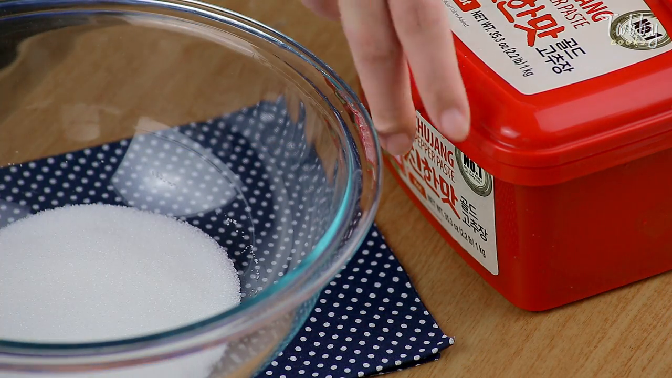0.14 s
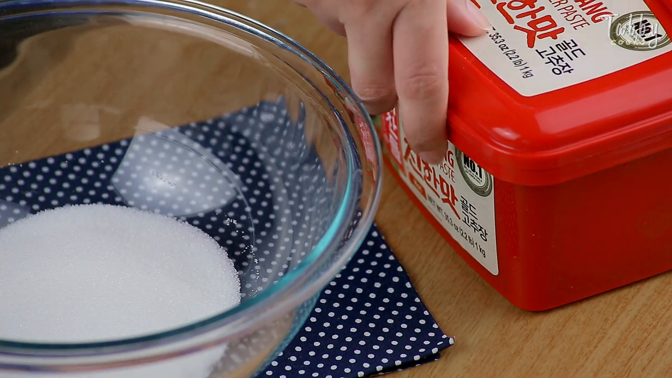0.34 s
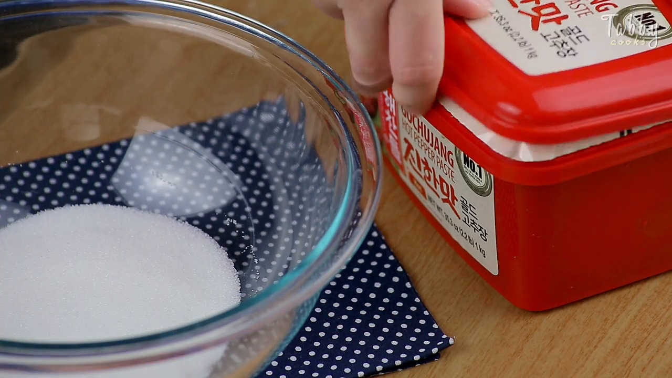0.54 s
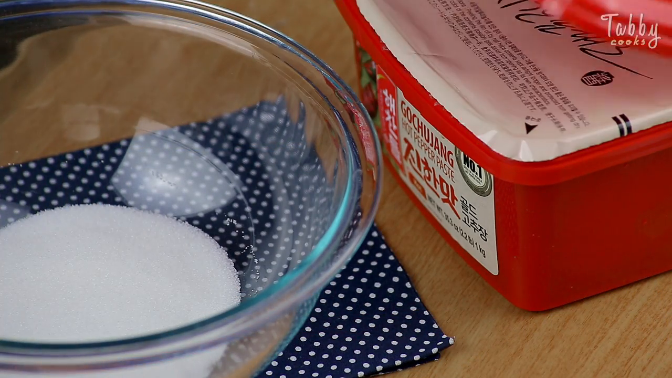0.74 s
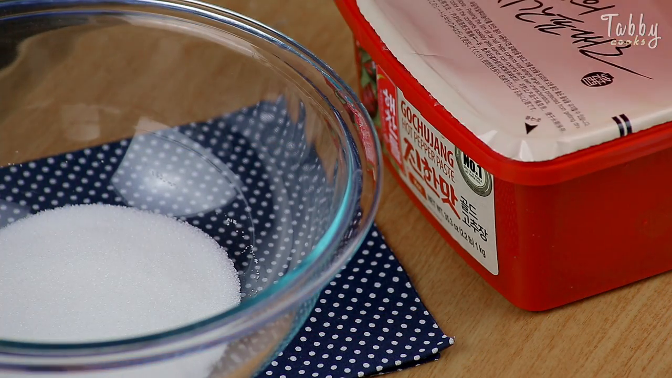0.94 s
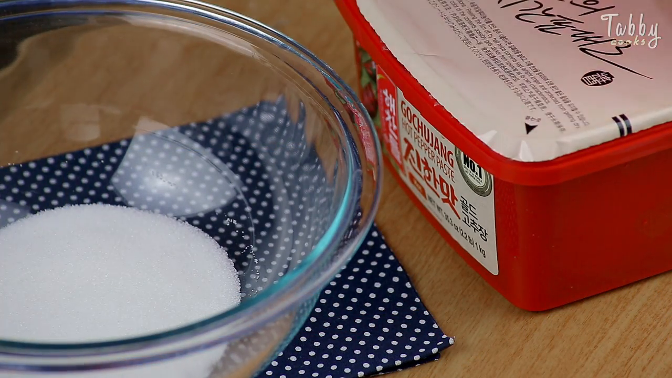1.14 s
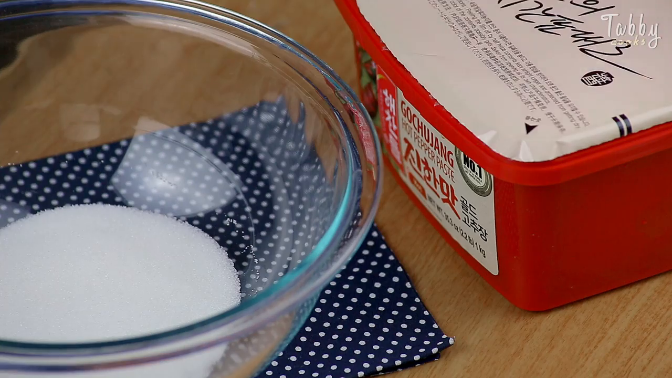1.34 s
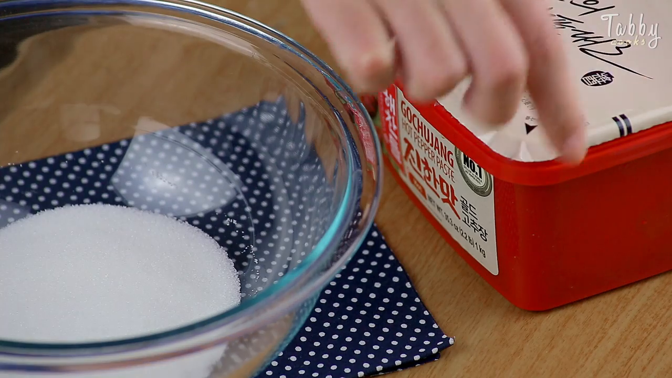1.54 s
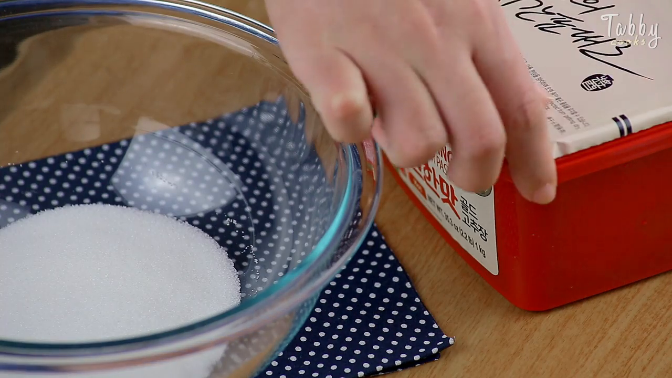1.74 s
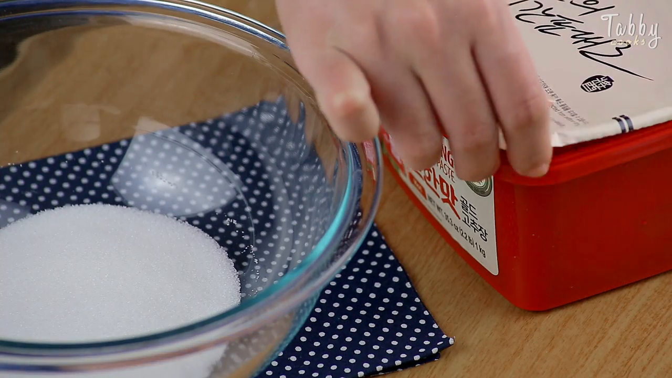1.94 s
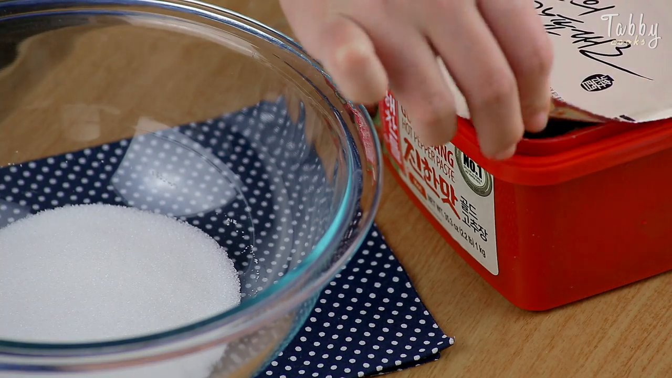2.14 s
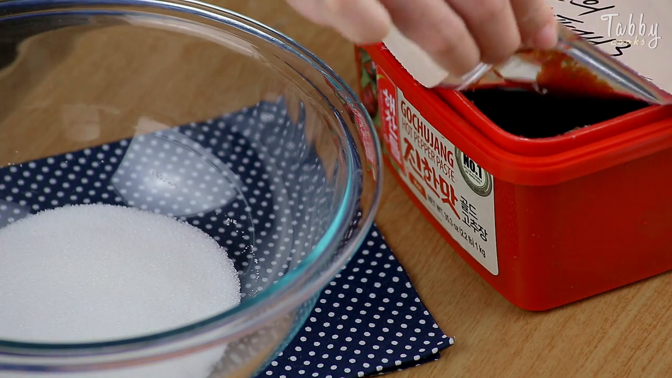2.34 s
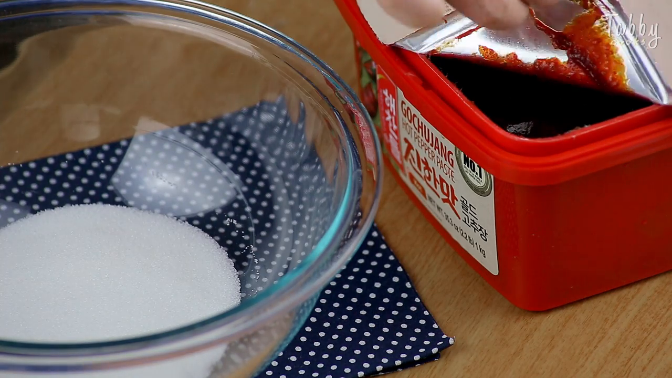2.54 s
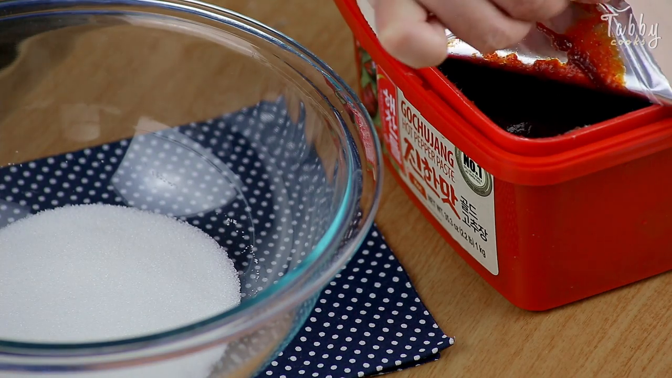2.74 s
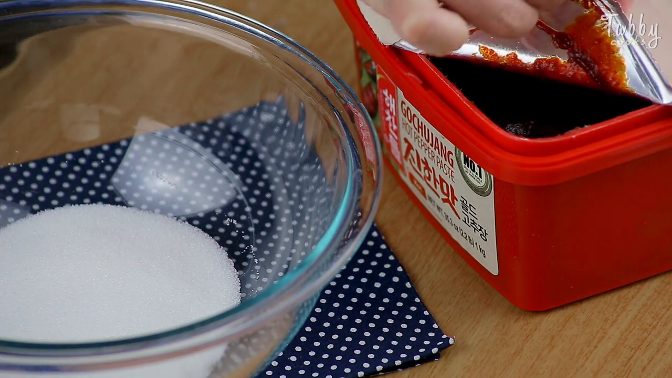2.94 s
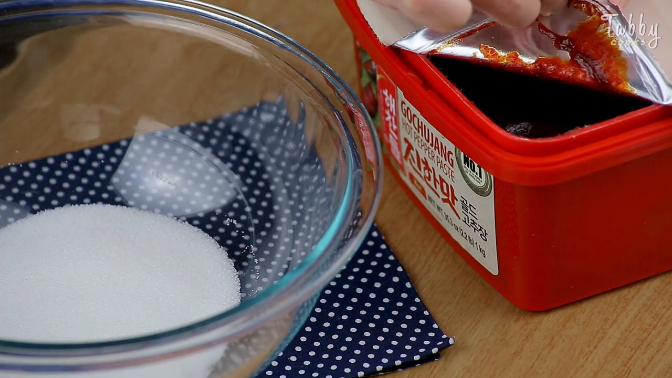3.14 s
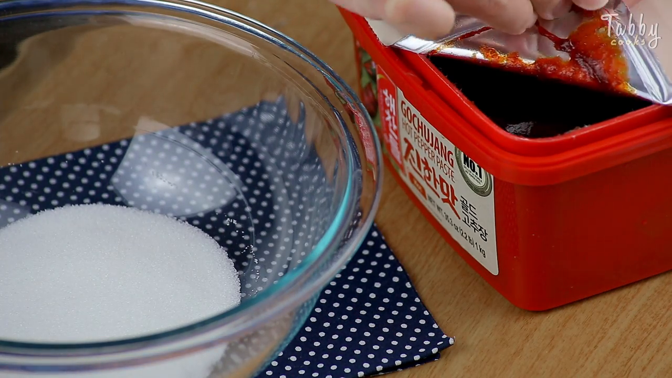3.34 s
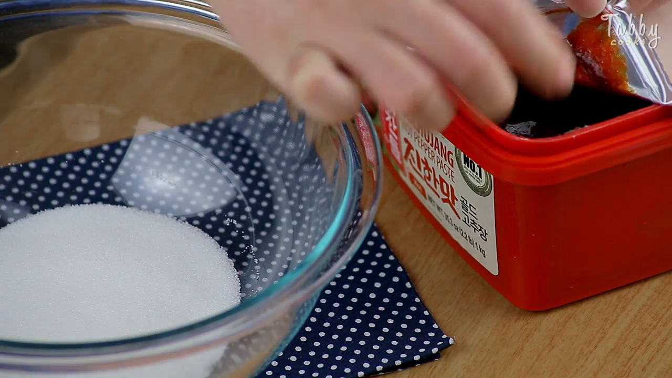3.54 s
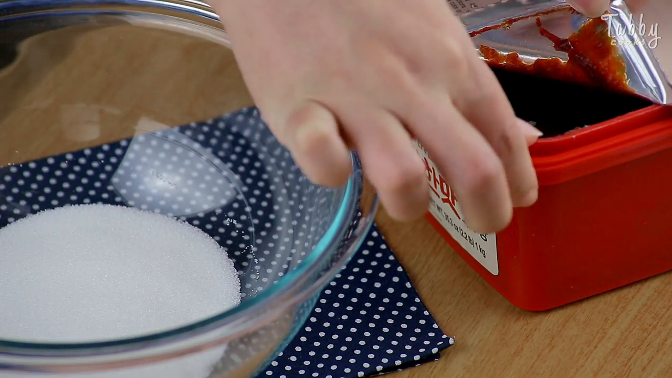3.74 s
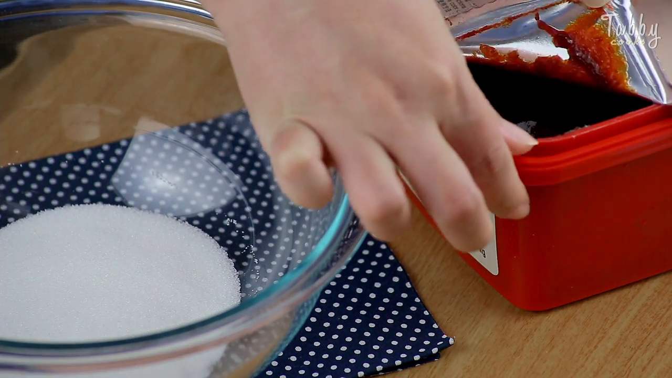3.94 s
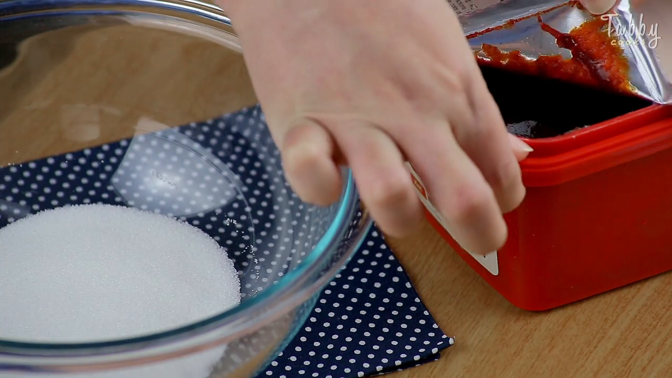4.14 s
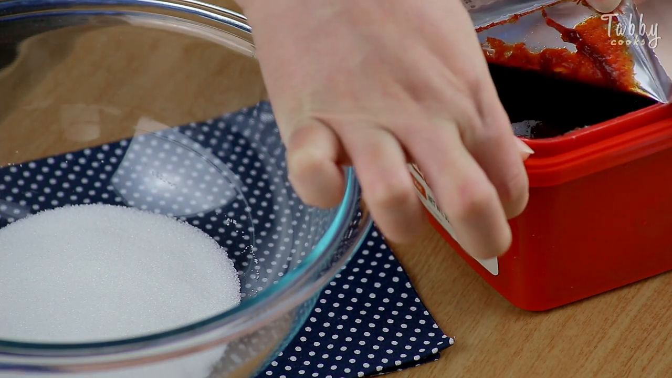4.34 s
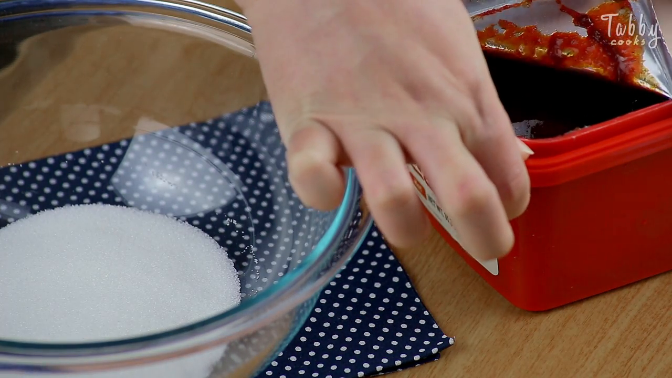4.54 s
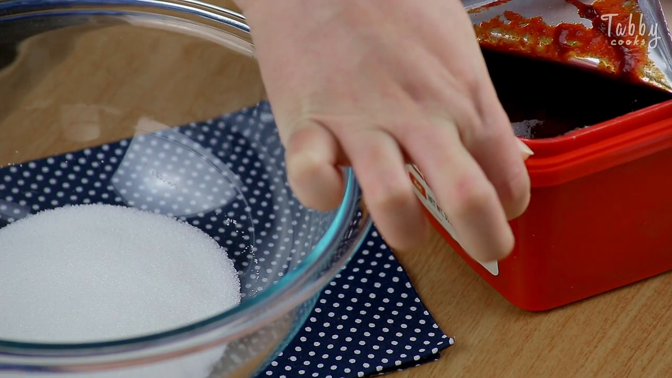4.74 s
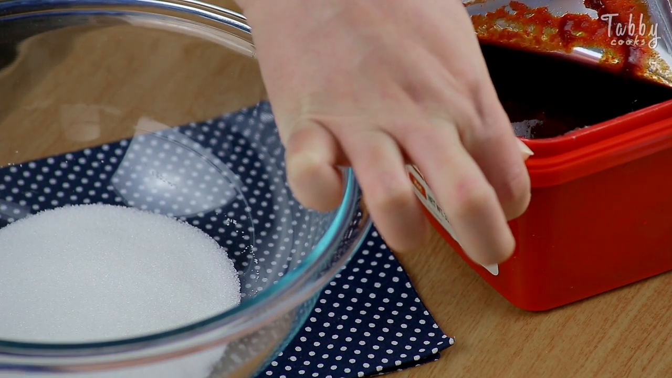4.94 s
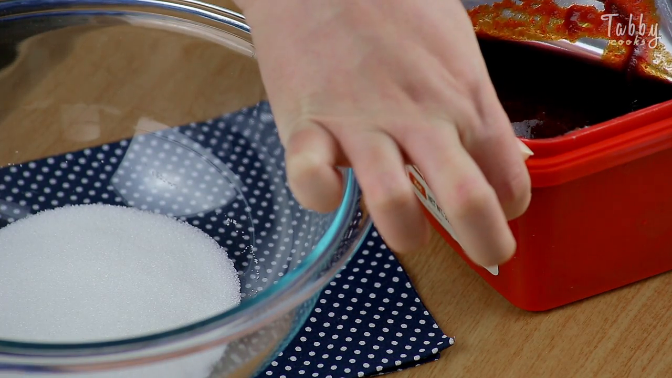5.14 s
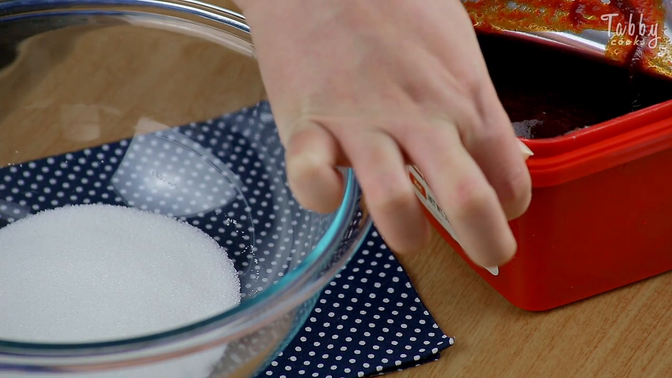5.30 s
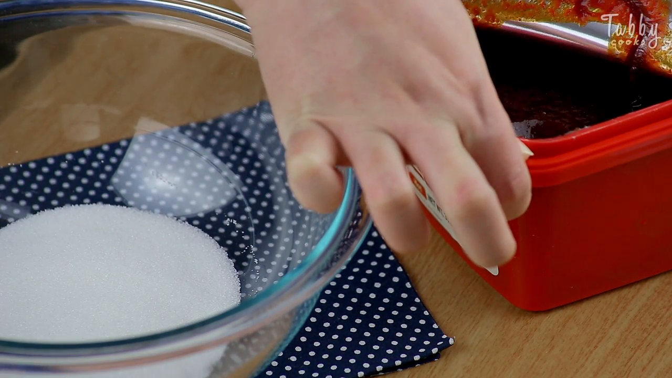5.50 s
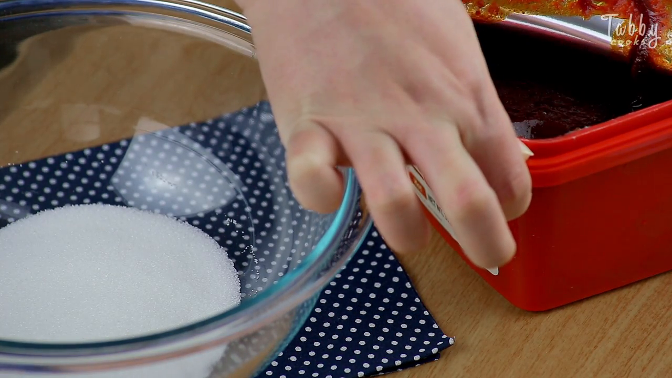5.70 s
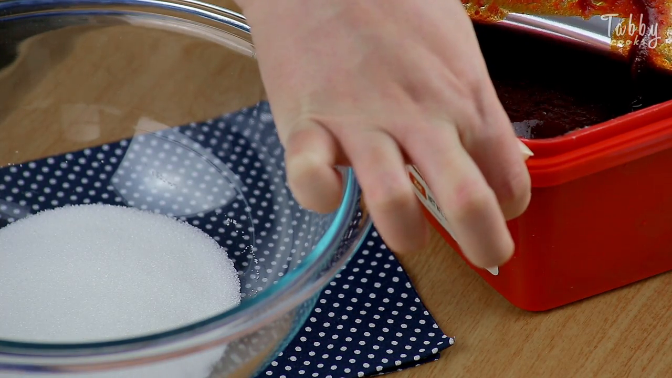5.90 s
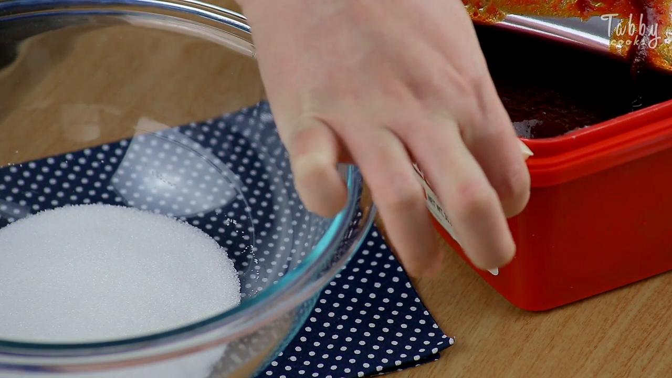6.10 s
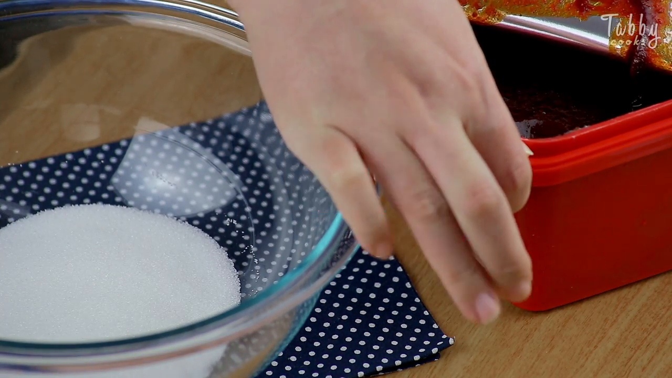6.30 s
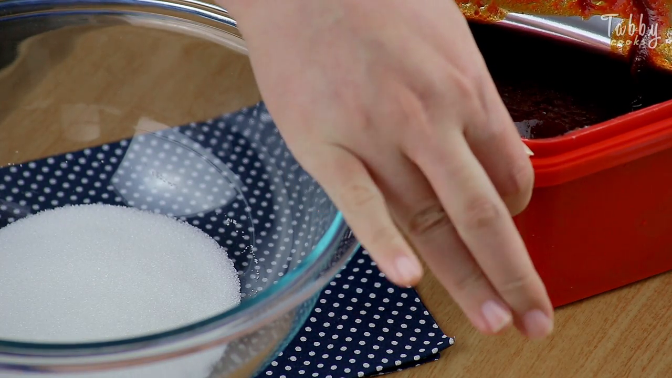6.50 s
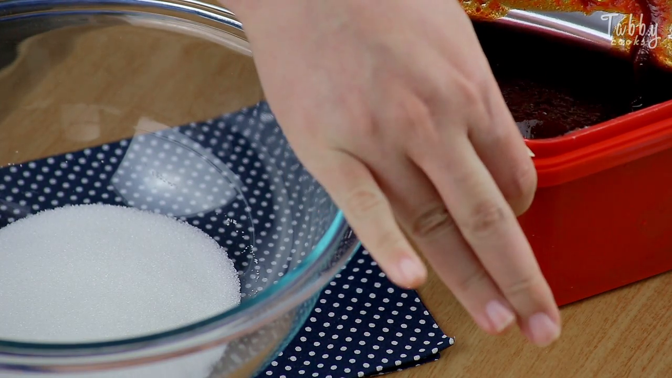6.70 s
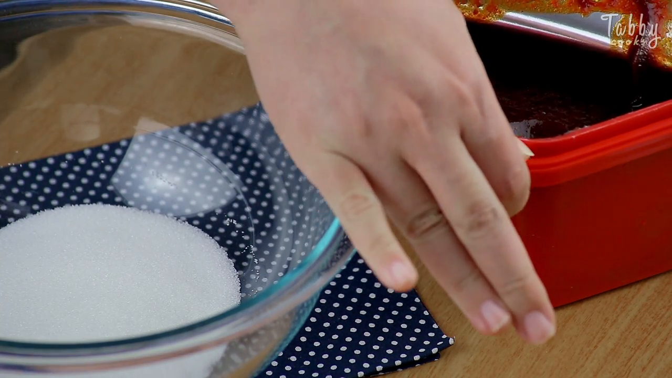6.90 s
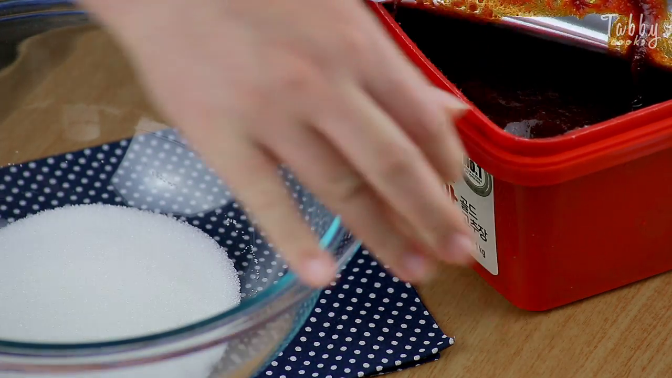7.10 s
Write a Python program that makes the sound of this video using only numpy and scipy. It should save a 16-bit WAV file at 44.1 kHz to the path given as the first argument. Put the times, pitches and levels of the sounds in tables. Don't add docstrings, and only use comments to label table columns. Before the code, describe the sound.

A plastic lid comes off with a short dull creak and scratchy finger rubs; near silence follows. A foil seal then lifts with padded knocks and bright tearing snaps, pauses while the hand shifts, and peels in quick crackling jerks with taut foil rustling. Low thuds shake the wooden table. Close, dry microphone, short reflections from a small room, faint room tone.

```python
import sys
import numpy as np
from scipy import signal
from scipy.fft import rfft, irfft, next_fast_len
from scipy.io import wavfile
from scipy.ndimage import uniform_filter1d, map_coordinates

SR = 44100
rng = np.random.default_rng(int(sys.argv[2]) if len(sys.argv) > 2 else 0)


def level_to_linear(level):
    exponent = np.asarray(level, float) / 20
    return 10 ** exponent


def transcribe(u):
    v = np.clip(np.atleast_2d(u).T, -1, 1)
    q = np.round(v * 32767).astype(np.int16)
    wavfile.write(sys.argv[1], SR, q)


N = 315749

# [freq_hz, level_db]
KITCHEN_COLOUR = [(120, -49.5), (200, -15.5), (342, -18), (468, -20.5), (652, -22.5), (742, -22),
                  (2600, -23), (3370, -36.5), (16500, -54.5)]
HISS_COLOUR = [(2500, -4), (3500, -11.5), (14000, -18), (16000, -17), (16500, -37)]

# [time_s, thump_db, sway_over_thump_db, drum_over_thump_db]
TABLE_JOLTS = [(0.3, -33, -5, -1.5), (0.541, -36, -7.5, -2), (0.638, -41.5, -1.5, -2),
               (0.753, -46.5, 6, -10), (0.884, -33, -7, -22), (1.285, -67.5, 11, -12),
               (1.769, -37, -4, -8.5), (2.048, -33.5, -10.5, -6), (2.271, -37, -4.5, -4),
               (2.42, -39, -8, -6), (2.536, -20, -9, -13), (2.838, -42, 2, -9), (2.968, -22, -19.5, -19.5),
               (3.461, -41, -7, -3.5), (3.657, -38.5, 4, -1), (3.8, -35, -8, -7), (3.879, -18.5, -9, -16.5),
               (4.029, -43, 2, -9), (4.263, -39, 12.5, -8.5), (4.417, -19, -2.5, -13),
               (4.569, -28.5, -1, -13.5), (4.706, -21, -3.5, -19), (4.919, -32, 9, -18),
               (5.112, -13, -6, -19), (5.302, -20.5, -4, -17), (5.543, -15, -8.5, -21),
               (5.677, -35, -5, -7.5), (5.86, -35, 3, -30), (6.3, -55, 9, -14), (6.549, -45, 3, -16),
               (6.737, -39, 10.5, -17), (6.9, -26.5, -3, -9), (7.007, -35, -9, -7.5)]
# level with hands still [level_db], swell [rise_s], decay [t60_s]
TABLE_REST_DB = (-65, -63, -75)
TABLE_RISE_S = (.03, 0.0057, 0.0073)
TABLE_T60_S = (.85, 0.42, 0.4)

# [time_s, level_db, lifted_0_to_1]
LID_CREAKS = [
    (.24, -85, 0.2),
    (.3, -34.5, 0.02),
    (.36, -56, 0.03),
    (.46, -69, 0),
    (.515, -34.5, 0.75),
    (.6, -40.5, 1),
    (.7, -61, 0.8),
    (.86, -82, 0.8),
]
# [freq_hz, width_hz, level_db]
LID_SEATED = [(505, 110, 0)]
LID_FREE = [(344, 330, -7), (587, 140, 0.5), (750, 203, 0), (1180, 1440, -9.5)]
# [start_s, end_s, level_db]
FINGER_RUBS = [
    [(.262, .36, -49.5), (.305, .328, -40.5), (.425, .55, -47.5), (.5, .7, -45), (.615, .635, -32),
     (.67, .86, -54.5), (.748, .778, -48.5), (1.14, 1.185, -72)],
    [(1.704, 1.765, -57.5), (1.797, 1.87, -50), (1.82, 1.846, -43), (1.883, 1.915, -61.5),
     (2.42, 2.48, -65)],
    [(3.146, 3.19, -44), (3.203, 3.243, -40.5), (3.252, 3.278, -54.5), (3.283, 3.308, -50.5),
     (3.322, 3.352, -51), (3.345, 3.415, -54)],
    [(3.898, 3.928, -60.5), (3.975, 3.992, -71.5), (4.022, 4.038, -70.5), (4.235, 4.25, -68)],
    [(4.21, 4.335, -60), (4.35, 4.385, -55), (4.58, 4.67, -63), (4.74, 4.84, -65)],
    [(3.62, 3.71, -54), (3.69, 3.8, -57), (3.8, 3.89, -59), (3.93, 4.06, -64), (3.45, 3.56, -53),
     (6.9, 6.99, -52)],
]
# [freq_hz, width_hz, level_db]
SKIN_COLOURS = [
    [(1880, 1200, -5.5), (3250, 800, 1.5), (4960, 1250, 2.5), (6630, 3000, 1), (8590, 2700, -2),
     (12300, 4000, -15)],
    [(3140, 150, -9.5), (4390, 620, -10.5), (5330, 500, -6), (6800, 770, -5), (9070, 2000, -14.5)],
    [(2400, 1200, -11.5), (3480, 300, -2), (4690, 790, -0.5), (6600, 1250, -3), (8250, 800, -6),
     (9500, 1200, -10), (12700, 4000, -14.5)],
    [(4640, 2100, 4), (9400, 1200, 3)],
    [(1850, 350, 0)],
    [(1900, 500, -1), (3400, 550, 0), (4700, 800, -4)],
]

# [freq_hz, width_hz, level_db]
TUB_WALLS = [(306, 470, -1), (664, 230, -2.5)]
SEAL_SHEET = [(1000, 886, -0.5), (1730, 1077, 5.5), (2275, 2250, 1)]
FOIL_SHEET = [(3660, 1300, 0.55), (4950, 2100, 0.14)]
FOIL_CREASES = [(5500, 2300, -1.5), (7600, 1300, 1.5), (8640, 1100, -2)]
TORN_EDGE = [(9440, 1900, -1), (12160, 5600, -1.4), (15200, 4500, -2.5)]

# [time_s, strength_db, flap_pitch_hz, crispness_db]
TUB_KNOCKS = [(.301, -27.5, 515, -30), (.321, -25.5, 517, -33.5), (.5164, -39, 2680, 27.5),
              (.6588, -30, 1810, 19), (2.067, -18, 1000, -3), (2.3484, -23, 1340, -0.5),
              (2.4021, -29.5, 940, -27), (2.434, -48, 1540, 10), (2.5441, -21.5, 1670, -7),
              (2.9756, -17, 1130, -5.5), (3.6421, -31.5, 987, -20), (3.6864, -32.5, 1900, -3),
              (3.6913, -27.5, 1200, 5), (3.8388, -30, 950, -2), (3.8612, -33, 1250, -19),
              (3.888, -25, 1180, -16), (4.326, -47, 2510, -14), (4.3345, -16, 1600, -30),
              (4.393, -19, 2080, -16), (4.4348, -14, 1810, -9), (4.7037, -25.5, 1930, 1),
              (5.309, -35, 1770, -4), (5.9991, -41, 800, -26), (6.108, -51.5, 902, -31),
              (6.318, -43, 1232, -35), (7.005, -32.5, 1280, -21), (7.0203, -13.5, 1430, -21)]
# [time_s, strength_db, flap_pitch_hz, crispness_db]
SHEET_POPS = [(.4564, -60, 3020, 41.5), (6.9008, -9.5, 1610, -9), (.546, -31.5, 1290, -13),
              (.757, -36, 2150, -6), (.6131, -45, 1020, -18), (.6224, -27.5, 800, -6),
              (.6496, -27, 1930, 4), (1.8484, -24, 960, -42), (1.8588, -21.5, 945, -22),
              (1.9063, -14.5, 1010, -44), (1.919, -23, 1000, -55), (2.2101, -24.5, 820, -20),
              (2.2382, -26, 920, -43), (2.2429, -25.5, 1700, -15), (2.4785, -13, 1950, -13),
              (2.8416, -26, 2160, 8), (2.8807, -43, 2400, 20), (2.9672, -33, 1250, -20),
              (3.105, -30.5, 1070, -30), (3.6148, -31.5, 1280, -22), (3.8052, -22.5, 1184, -16),
              (.5097, -39, 700, -10), (4.3442, -26.5, 1150, -33), (4.599, -44.5, 1730, -15),
              (1.764, -22.5, 860, -65), (1.7816, -23, 1010, -61), (2.9251, -22, 1550, 7),
              (7.0358, -16.5, 1400, -5), (7.0848, -29, 1280, -19)]
# [time_s, strength_db, flap_pitch_hz, crispness_db]
HEAVY_RIPS = [(2.519, -15, 2200, 0), (4.3088, -37.5, 1930, 6.5), (4.3844, -27.5, 1960, -3),
              (4.4154, -23, 1340, 1.5), (4.4783, -34, 815, -9), (4.5036, -35.5, 1510, 7.5),
              (4.5202, -29, 890, -7), (4.6812, -48.5, 2400, 23.5), (4.6917, -23.5, 2270, 1.5),
              (4.725, -40.5, 2500, 13), (4.9007, -32.5, 1090, 2.5), (5.0903, -18, 1180, -1.5),
              (5.1215, -38, 2400, 8), (5.1325, -32.5, 1850, 10.5), (5.2811, -26, 1350, 5),
              (5.2931, -35, 1260, 9), (5.5216, -32.5, 2440, 8), (5.5259, -31.5, 1150, 9.5),
              (5.5314, -17, 1192, -0.5), (6.765, -60, 2400, 12)]
# [time_s, strength_db, flap_pitch_hz, crispness_db]
LIGHT_SNAPS = [(2.0072, -12.5, 1740, -2), (4.389, -26, 1850, -1.5), (4.4617, -33, 1070, -8),
               (4.4941, -32, 1980, 2.5), (4.5261, -20.5, 1370, -9), (4.5424, -39, 1840, 3),
               (4.5476, -25.5, 1880, -5), (4.844, -26.5, 1520, 5), (5.1418, -37, 900, 8.5),
               (5.2087, -27.5, 1780, 0), (5.2407, -38.5, 1240, 10), (5.2662, -21, 1680, -5),
               (5.5877, -28.5, 2000, -2.5), (5.601, -31.5, 1240, 4), (5.6102, -33.5, 1240, 11.5),
               (5.6716, -19, 1160, -6.5)]
# [time_s, strength_db, flap_pitch_hz, crispness_db]
RIM_LIFTS = [
    (2.052, -23.5, 910, -12),
    (2.0648, -31, 1500, -3),
    (2.2695, -11.5, 1290, -8),
    (2.5637, -23.5, 1474, -9),
    (3.4462, -15.5, 1700, -2),
    (3.473, -30, 1900, -3),
    (5.23, -44, 2070, 4),
    (4.3466, -40, 1900, -14),
]
# [time_s, strength_db, crispness_db]
FOIL_TICKS = [(4.2525, -44, 13), (4.2667, -60, 9), (4.2823, -48, 14), (4.3016, -42, 10), (4.4376, -48, 10),
              (4.4472, -48, 6), (4.4718, -52, 10), (4.4853, -41, 6), (4.5068, -36, 9), (4.5678, -43.5, 12),
              (4.6726, -38, -1), (4.687, -43, 7), (4.7185, -47, 11), (4.835, -47, 9), (4.8724, -46, 13),
              (4.8799, -38.5, 9), (4.8947, -42, 3), (4.9043, -44, 8), (4.9253, -47, 7),
              (4.9409, -38.5, 7.5), (5.0047, -47, 4), (5.0538, -47, 16.5), (5.0765, -36, 8.5),
              (5.276, -44, 9), (5.3301, -36, 9), (5.4164, -56.5, 9), (5.4308, -51, 22.5), (5.4859, -61, 24),
              (5.4972, -44, 7.5), (5.6313, -35, 5), (5.7534, -58, 12), (5.7637, -34.5, 9.5),
              (6.5982, -56.5, 20.5), (6.6118, -64, 12), (6.7358, -49, 13)]

# [time_s, peak_db]
GLUE_CRACKS = [(4.2533, -24.5), (4.2826, -29), (4.3018, -24), (4.3091, -22), (4.3259, -33), (4.3845, -28),
               (4.3891, -14), (4.4158, -24), (4.4373, -30), (4.4473, -31), (4.4786, -35), (4.4857, -30),
               (4.4943, -18), (4.5031, -22), (4.5069, -29), (4.5203, -27), (4.5425, -25), (4.5475, -22),
               (4.5678, -20.5), (4.6728, -35), (4.6805, -26), (4.6918, -10), (4.7252, -15), (4.8444, -18),
               (4.8725, -25), (4.8803, -24), (4.8943, -32), (4.9008, -26), (4.9254, -32), (4.9412, -25),
               (5.0543, -27), (5.0767, -20), (5.0903, -8), (5.1216, -12), (5.1332, -24), (5.1419, -20),
               (5.2096, -22), (5.2299, -30), (5.2408, -16), (5.267, -26), (5.2754, -32), (5.2806, -13.5),
               (5.2932, -17), (5.3305, -19), (5.431, -22), (5.486, -35), (5.4977, -23), (5.5218, -16),
               (5.5262, -15), (5.5309, -11.5), (5.5879, -22), (5.6014, -20), (5.6098, -20), (5.6318, -22),
               (5.764, -15), (6.5983, -30)]
# [time_s, peak_db, pitch_hz, decay_cycles]
SHEET_BUCKLES = [(.5172, -13, 6200, 16), (2.0076, -4, 7200, 10), (2.0074, -16.5, 880, 6.6),
                 (2.2698, -13, 4250, 11), (2.2696, -22, 520, 7.3), (2.5189, -2.5, 4700, 8.3),
                 (3.4462, -12.5, 3620, 17), (3.4462, -21.5, 595, 14), (3.4464, -17, 1200, 16),
                 (4.3343, -11, 1000, 3.2), (4.4348, -3, 1520, 3.3), (4.4348, -13.5, 2870, 5),
                 (5.6714, -14, 1680, 3), (5.6715, -19.5, 4970, 4), (6.9008, -17.5, 400, 5),
                 (6.9009, -20, 3510, 15), (4.2533, -36, 1850, 25), (4.2826, -40, 1850, 25),
                 (4.31, -40, 1850, 25), (2.4788, -17, 900, 5), (.4567, -22, 6500, 14),
                 (2.8815, -28, 5000, 9), (2.9262, -15, 5000, 9), (3.6913, -23, 4500, 9),
                 (1.764, -36, 480, 14), (1.782, -36, 420, 14), (5.7642, -25, 3200, 9),
                 (2.8416, -27, 3600, 12), (.77, -48, 230, 18), (6.9012, -18, 2200, 9),
                 (2.4792, -19, 2900, 6), (7.0364, -19.5, 4370, 5), (7.085, -36.5, 3180, 13)]

# [time_s, level_db]
FOIL_GASPS = [
    (2.009, -41),
    (2.52, -33.5),
]
# [start_s, end_s, level_db]
FOIL_TUGS = [
    (4.229, 4.34, -64),
    (4.373, 4.583, -52.5),
    (4.664, 4.741, -44),
    (4.841, 4.957, -50),
    (5.05, 5.16, -54),
    (5.197, 5.339, -56),
    (5.524, 5.697, -56.5),
]


def unit(x):
    return x / np.sqrt(np.mean(x ** 2) + 1e-20)


def wobble(rate):
    knots = rng.standard_normal(int(N * rate / SR) + 4)
    return map_coordinates(knots, [np.arange(N) * rate / SR])


def filtered(x, response):
    m = next_fast_len(N + SR // 2)
    return irfft(rfft(x, m) * response(np.fft.rfftfreq(m, 1 / SR)), m)[:N]


def hiss(colour):
    hz, db = np.transpose(colour)
    shape = lambda f: level_to_linear(np.interp(np.log(f + 1), np.log(hz), db, -120, -120))
    return unit(filtered(rng.standard_normal(N), shape))


def kitchen():
    floor_db, air_db, air_end_s = -69.5, -74.5, 1.64
    tone = level_to_linear(floor_db + 0.91 * wobble(18)) * hiss(KITCHEN_COLOUR)
    air = level_to_linear(air_db + 0.59 * wobble(7.7)) * (np.arange(N) < air_end_s * SR)
    return tone + air * hiss(HISS_COLOUR)


def modes(body):
    def response(f):
        total = 0
        for k, (hz, width, db) in enumerate(body):
            total = total + (-1) ** k * level_to_linear(db) * 1j * f * width / (hz * hz - f * f + 1j * f * width)
        return total
    return response


def rough(body):
    return unit(filtered(rng.standard_normal(N), lambda f: modes(body)(f) ** 2))


def blows_at(times_s, strengths):
    return np.bincount(np.round(np.asarray(times_s) * SR).astype(int), strengths, N)


def decaying(x, t60):
    return signal.lfilter([1], [1, -level_to_linear(-120 / (t60 * SR))], x)


def shaken(db, rest_db, rise, t60):
    linger_db, linger_t60 = -26, 3.2
    lean_db, lean_t60 = -9.5, 0.17
    kicks = blows_at(np.array(TABLE_JOLTS)[:, 0], level_to_linear(2 * db))
    power = decaying(kicks, t60) + level_to_linear(2 * linger_db) * decaying(kicks, linger_t60)
    power = power + level_to_linear(2 * lean_db) * decaying(kicks[::-1], lean_t60)[::-1]
    swell = np.exp(-1 / (rise * SR))
    power = signal.lfilter([1 - swell], [1, -swell], power)
    return np.sqrt(power + level_to_linear(2 * rest_db))


def steady(x, window_s):
    return x / np.sqrt(np.abs(uniform_filter1d(x * x, round(window_s * SR))) + 1e-9)


def table():
    _, thump_db, sway_db, drum_db = np.transpose(TABLE_JOLTS)
    levels = [thump_db + sway_db + 2.0, thump_db - 3.5, thump_db + drum_db]
    gains = [shaken(*row) for row in zip(levels, TABLE_REST_DB, TABLE_RISE_S, TABLE_T60_S)]
    sway = gains[0] * steady(rough([(28.3, 11.0, 0)]), 0.33)
    boom = gains[1] * steady(rough([(57.72, 36, 0.0), (77.25, 15, 5.5), (106.5, 33, -8.0)]), 0.06)
    drum = gains[2] * steady(rough([(125, 62, -4.0), (174.8, 16, 3.0)]), 0.12)
    return sway + boom + drum


def lid():
    s, db, lifted = np.transpose(LID_CREAKS)
    t = np.arange(N) / SR
    creak_db = np.interp(t, s, db, -150, -150)
    lifted = np.interp(t, s, lifted, 0, 0)
    gain = level_to_linear(creak_db + 3.3 * wobble(50) + 2.1 * wobble(160))
    return gain * ((1 - lifted) * rough(LID_SEATED) + lifted * rough(LID_FREE))


def strokes(rows, roundness, skew=1.0):
    t = np.arange(N) / SR
    return sum(level * np.sin(np.pi * np.clip((t - a) / (b - a), 0, 1) ** skew) ** roundness for a, b, level in rows)


def fingers():
    out = np.zeros(N)
    room_fall = level_to_linear(-120 / (0.2 * SR))
    for rubs, skin in zip(FINGER_RUBS, SKIN_COLOURS):
        power = strokes([(a, b, level_to_linear(2 * db)) for a, b, db in rubs], roundness=2.3)
        power = power * level_to_linear(1.6 * wobble(70) + 3.2 * wobble(400))
        power = power + 0.07 * signal.lfilter([1 - room_fall], [1, -room_fall], power)
        out += np.sqrt(power) * rough(skin)
    return out


def releases():
    heavy_db, light_db = -3, -19
    padded_db, torn_db, rim_db, tick_db = -34, 2, -5, 5
    taut_hz = 1900
    ticks = [(s, db, taut_hz, crisp_db) for s, db, crisp_db in FOIL_TICKS]
    kinds = [(TUB_KNOCKS, heavy_db, padded_db), (SHEET_POPS, light_db, padded_db),
             (HEAVY_RIPS, heavy_db, torn_db), (LIGHT_SNAPS, light_db, torn_db),
             (RIM_LIFTS, light_db, rim_db), (ticks, light_db, tick_db)]
    rows = []
    for kind, tub_db, edge_db in kinds:
        for s, db, hz, crisp_db in kind:
            foil_db = db + crisp_db
            rows.append((s, db + tub_db, db, hz, foil_db, foil_db + edge_db))
    return rows


def dying(blows, t60, rise):
    swell = np.exp(-1 / (rise * SR))
    power = signal.lfilter([1 - swell], [1, -swell], decaying(blows ** 2, t60))
    return np.sqrt(power) * rng.standard_normal(N)


def struck(db, body, click_db, tear_t60, room_db, room_t60, top_hz, strain_db=-33):
    blows = blows_at(np.array(releases())[:, 0], level_to_linear(db))
    tear = dying(blows, tear_t60, rise=0.00016) - level_to_linear(click_db) * blows
    strain = level_to_linear(strain_db) * dying(blows[::-1], 0.082, rise=0.0011)[::-1]
    room = level_to_linear(room_db + 2.5 * wobble(60) + 2.5 * wobble(250)) * dying(blows, room_t60, rise=0.0024)
    return filtered(strain + tear + room, lambda f: modes(body)(f) ** 2 / (1 + 1j * f / top_hz) ** 2)


def ringing(db, pitch_hz, sharpness, click_db, ring_t60, room_db, room_t60):
    out, t = np.zeros(N + SR), np.arange(SR // 6) / SR
    decay = level_to_linear(-60 * t / ring_t60) + level_to_linear(room_db - 60 * t / room_t60)
    for row, level_db, hz in zip(releases(), db, pitch_hz):
        push = rng.standard_normal(len(t)) * decay
        push[0] = -level_to_linear(click_db)
        b, a = signal.iirpeak(hz, sharpness, SR)
        ring = signal.sosfilt([[*b, *a]] * 3, push)
        out[round(row[0] * SR):][:len(t)] += level_to_linear(level_db) * ring
    return out[:N]


def peeling():
    _, tub_db, seal_db, flap_hz, foil_db, edge_db = np.transpose(releases())
    crease_db = 0.73 * foil_db + 0.35 * edge_db
    softness_db = 0.53 * np.clip(seal_db - foil_db - 13.5, 0, 40)
    tub = struck(tub_db + 14, TUB_WALLS, click_db=15.5, tear_t60=0.044,
                 room_db=-13.5, room_t60=0.22, top_hz=1090)
    seal = struck(seal_db + 9.5 - softness_db, SEAL_SHEET, click_db=15, tear_t60=0.022,
                  room_db=-13.0, room_t60=0.18, top_hz=3250)
    foil = struck(foil_db - 0.5, FOIL_SHEET, click_db=5.5, tear_t60=0.019,
                  room_db=-20.5, room_t60=0.16, top_hz=8900)
    creases = struck(crease_db + 8.0, FOIL_CREASES, click_db=7.5, tear_t60=0.024,
                     room_db=-23.0, room_t60=0.23, top_hz=11800, strain_db=-38)
    edge = struck(edge_db + 3.5, TORN_EDGE, click_db=8, tear_t60=0.018,
                  room_db=-27.5, room_t60=0.18, top_hz=29000, strain_db=-45)
    flap = ringing(seal_db + 9.0, flap_hz, sharpness=1.93, click_db=18.0, ring_t60=0.027,
                   room_db=-17.5, room_t60=0.27)
    dent_over_flap, dent_lowest_hz = 2.15, 3660
    dent_hz = np.maximum(dent_over_flap * flap_hz, dent_lowest_hz)
    dent_hz = dent_hz * np.exp(0.11 * rng.standard_normal(len(foil_db)))
    dent = ringing(crease_db + 6.5, dent_hz, sharpness=2.3, click_db=9, ring_t60=0.018,
                   room_db=-23.0, room_t60=0.25)
    return tub + seal + foil + creases + edge + flap + dent


def wavelets(rows):
    out, t = np.zeros(N + SR), np.arange(SR // 10) / SR
    for s, db, hz, cycles in rows:
        shape = level_to_linear(-60 * t * hz / cycles) * (1 - np.exp(-t * hz / 0.6))
        out[round(s * SR):][:len(t)] -= level_to_linear(db) * shape / shape.max() * np.sin(2 * np.pi * hz * t)
    return out[:N]


def cracking():
    crack_hz, crack_cycles, lowest_hz = 6490, 5.5, 3200
    pitch_hz = crack_hz * np.exp(0.2 * rng.standard_normal(len(GLUE_CRACKS)))
    cracks = wavelets([(s, db, hz, crack_cycles) for (s, db), hz in zip(GLUE_CRACKS, pitch_hz)])
    thin = lambda f: (1j * f / (lowest_hz + 1j * f)) ** 2 * level_to_linear(2.5)
    return wavelets(SHEET_BUCKLES) + filtered(cracks, thin)


def shiver():
    s, db = np.transpose(FOIL_GASPS)
    blows = blows_at(s, level_to_linear(db))
    out = np.zeros(N)
    for body, level_db, t60 in [(FOIL_SHEET, 6, 0.36), (FOIL_CREASES, 3, 0.27), (TORN_EDGE, -6, 0.2)]:
        breath = level_to_linear(2.5 * wobble(90)) * dying(blows, t60, rise=0.0046)
        out += level_to_linear(level_db) * filtered(breath, modes(body))
    return out


def rustle():
    grains_per_s, spread_db = 1500, 2.5
    tension = strokes([(a, b, level_to_linear(db)) for a, b, db in FOIL_TUGS], roundness=0.77, skew=1.05)
    grain_db = spread_db * np.minimum(rng.exponential(size=N), 3) + 2.9 * wobble(40)
    grains = (rng.random(N) < grains_per_s / SR) * level_to_linear(grain_db)

    def sheet(f):
        low = level_to_linear(-1.5) * modes(SEAL_SHEET)(f) ** 2 + modes(FOIL_SHEET[1:])(f)
        return low + modes(FOIL_CREASES)(f) + level_to_linear(-8) * modes(TORN_EDGE)(f)

    return tension * unit(filtered(dying(grains, 0.012, rise=0.0002), sheet))


def scene():
    hands = lid() + fingers()
    seal = peeling() + cracking() + shiver() + rustle()
    return (kitchen() + table() + hands + seal)[None]


def top_cut(x):
    return signal.sosfilt(signal.butter(12, 16970, fs=SR, output="sos"), x)


def record(dry):
    mix = filtered(dry[0], lambda f: 1 / (1 + (f / 15900) ** 50))
    mix = mix * np.clip((N - np.arange(N)) / 400, 0, 1)
    return top_cut(mix[None])


dry = scene()
out = record(dry)
transcribe(out)
```